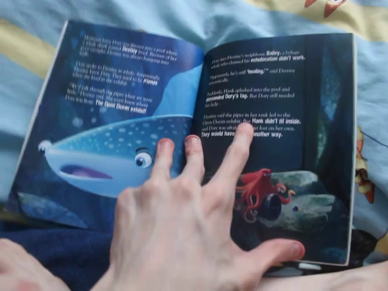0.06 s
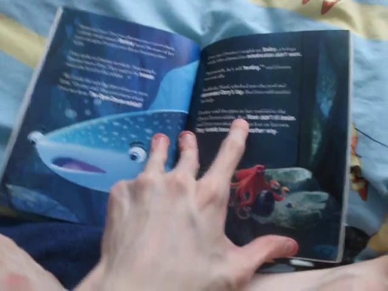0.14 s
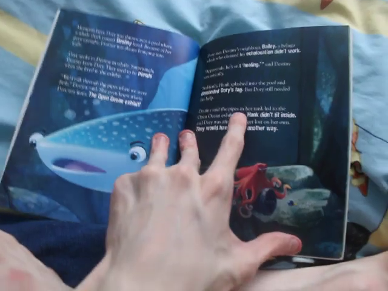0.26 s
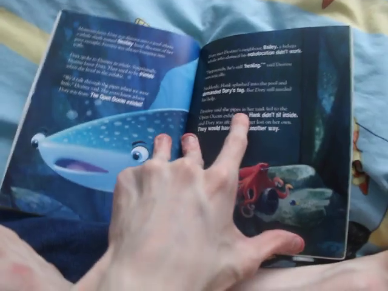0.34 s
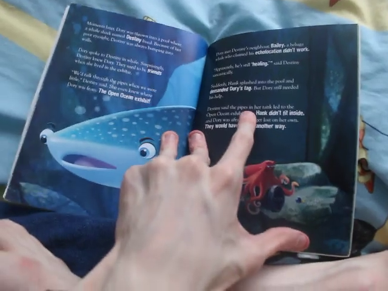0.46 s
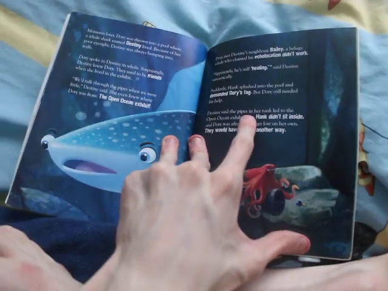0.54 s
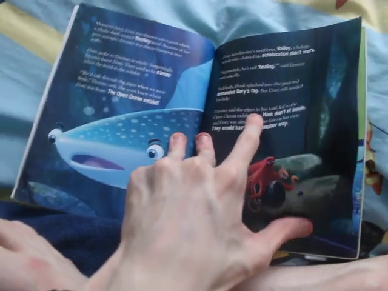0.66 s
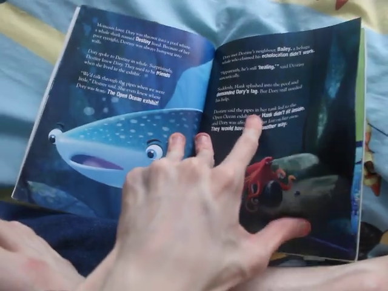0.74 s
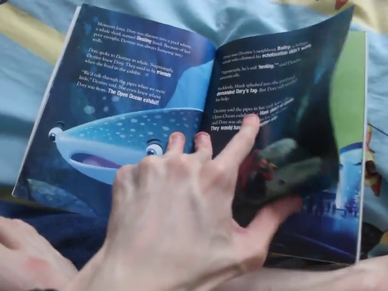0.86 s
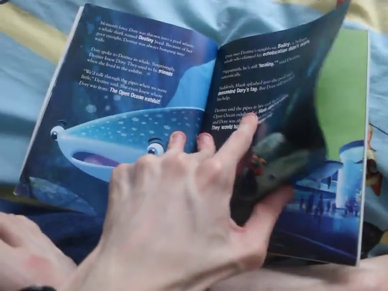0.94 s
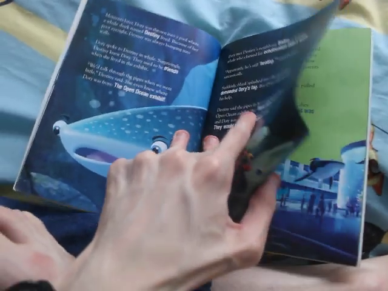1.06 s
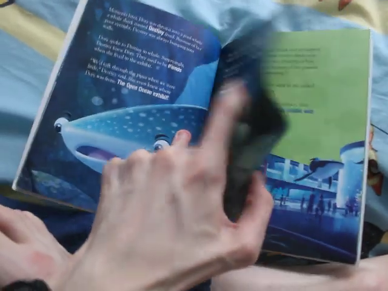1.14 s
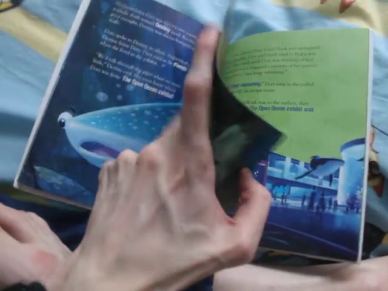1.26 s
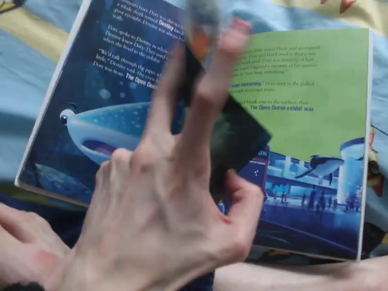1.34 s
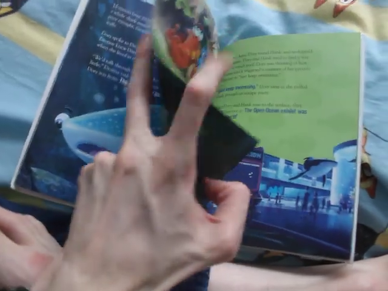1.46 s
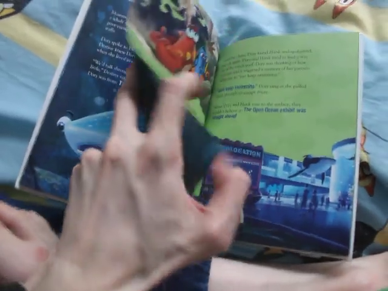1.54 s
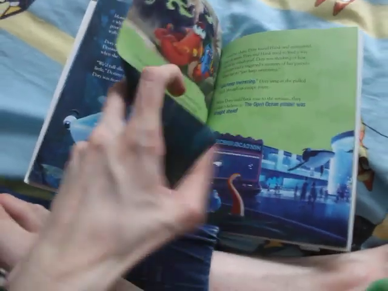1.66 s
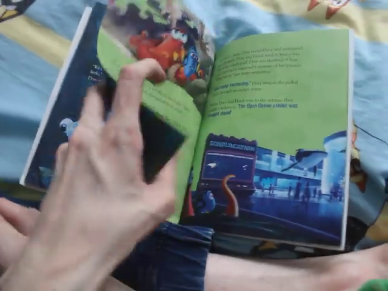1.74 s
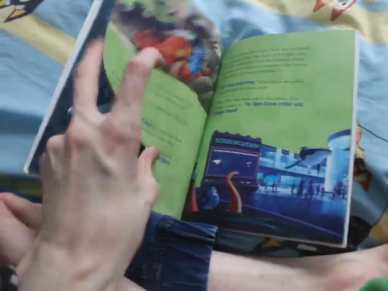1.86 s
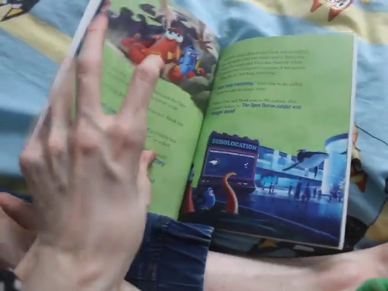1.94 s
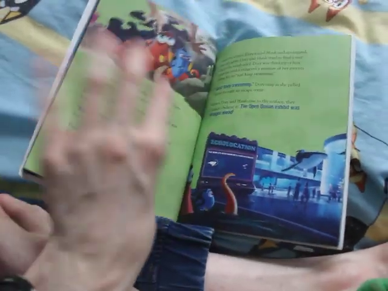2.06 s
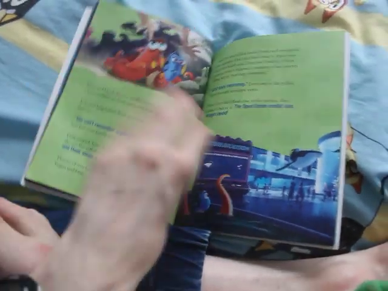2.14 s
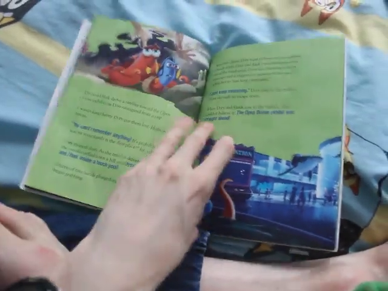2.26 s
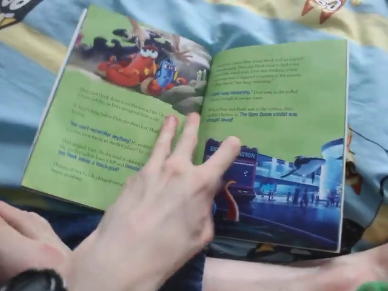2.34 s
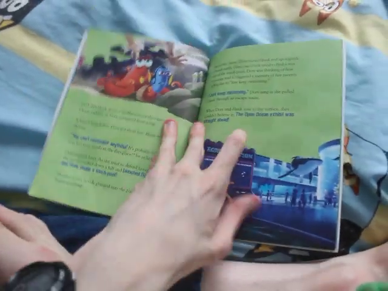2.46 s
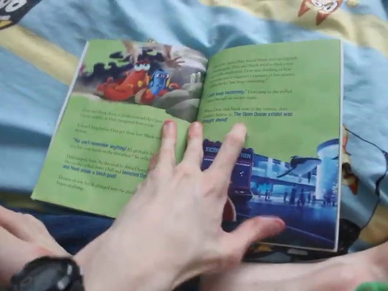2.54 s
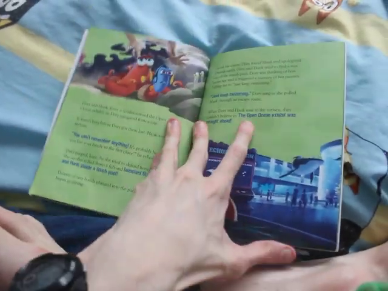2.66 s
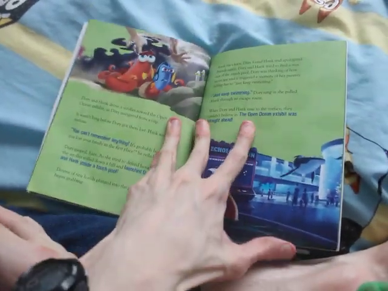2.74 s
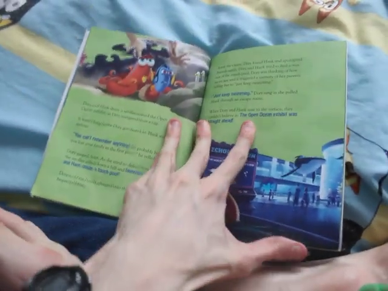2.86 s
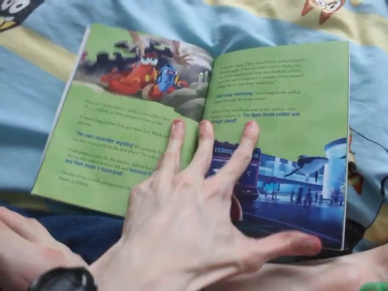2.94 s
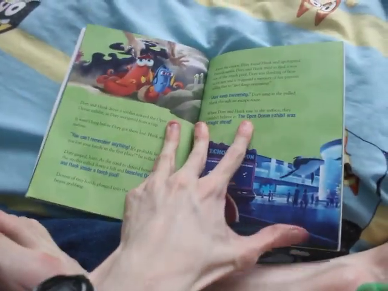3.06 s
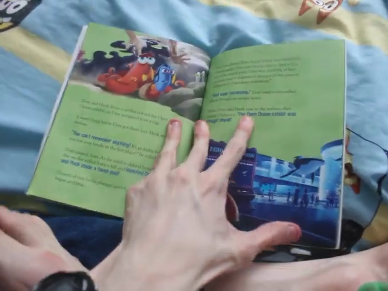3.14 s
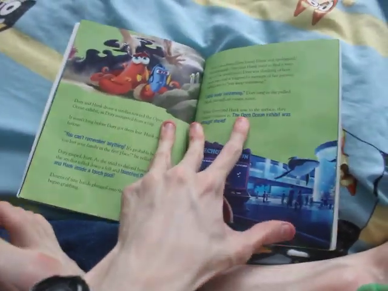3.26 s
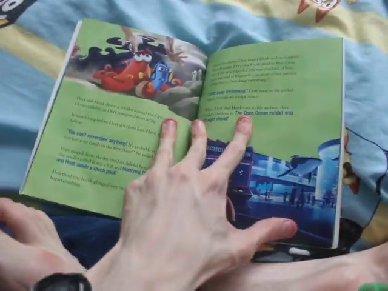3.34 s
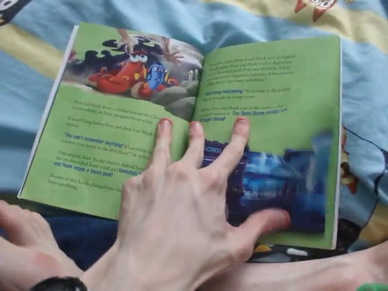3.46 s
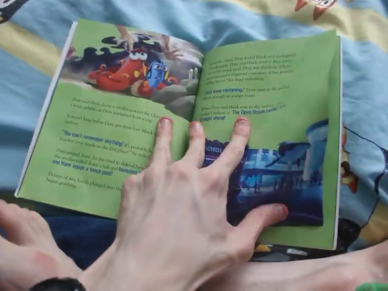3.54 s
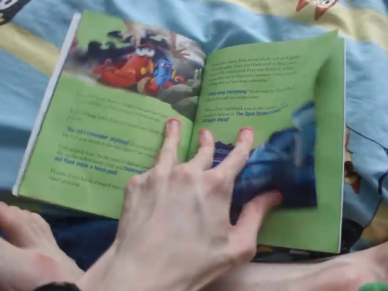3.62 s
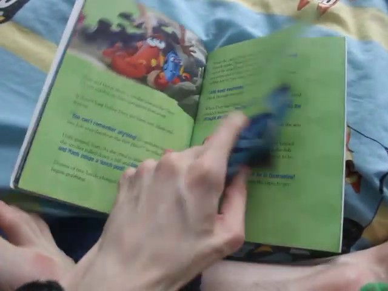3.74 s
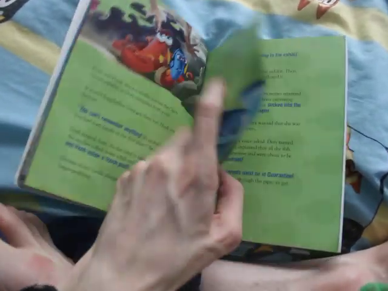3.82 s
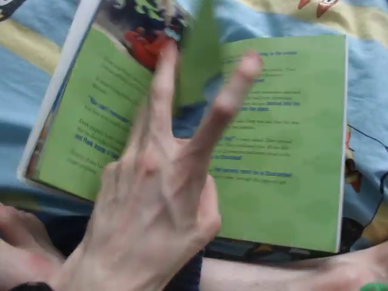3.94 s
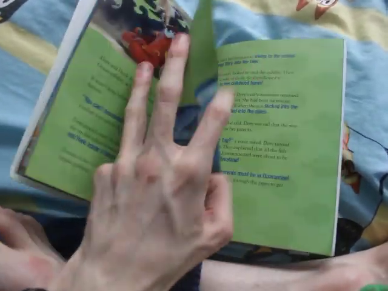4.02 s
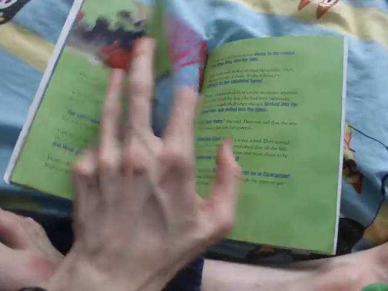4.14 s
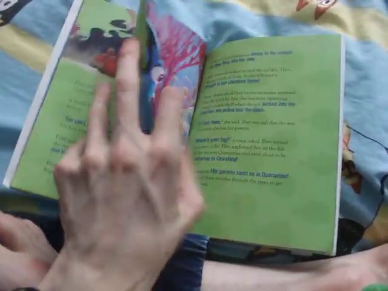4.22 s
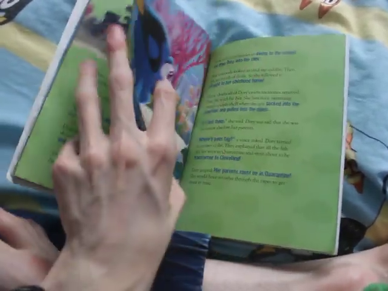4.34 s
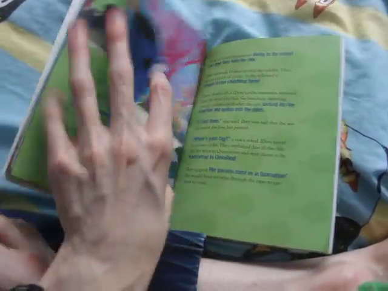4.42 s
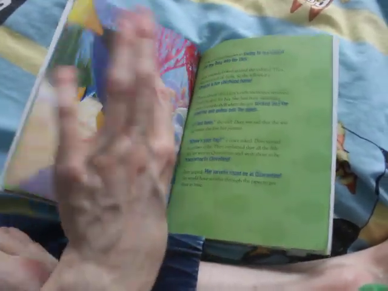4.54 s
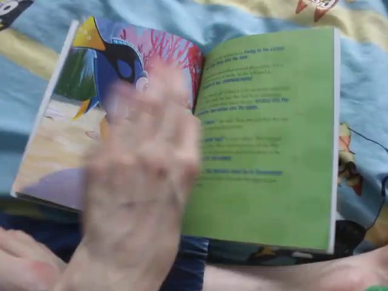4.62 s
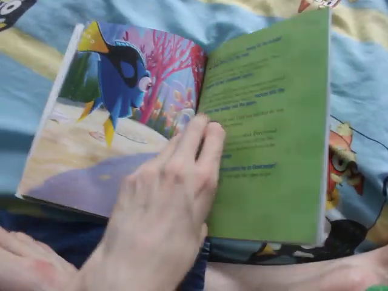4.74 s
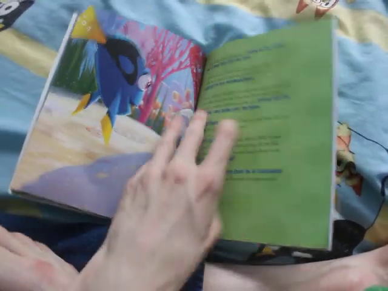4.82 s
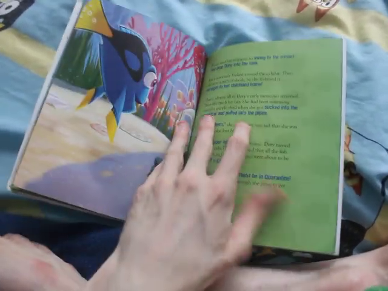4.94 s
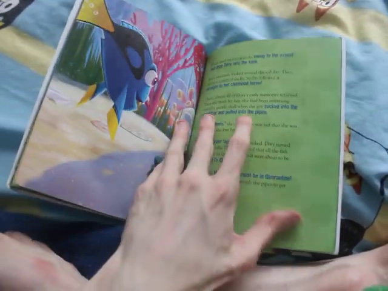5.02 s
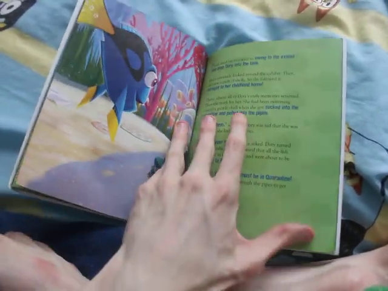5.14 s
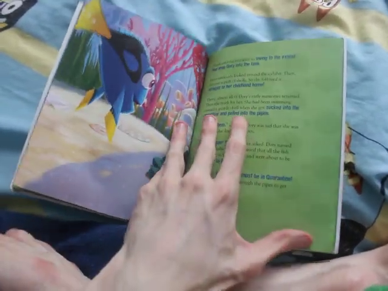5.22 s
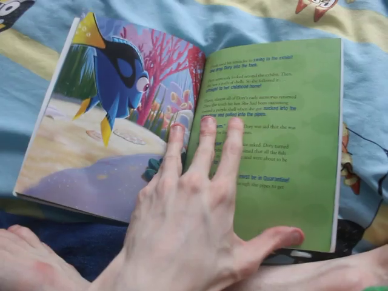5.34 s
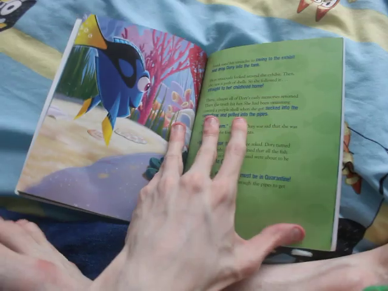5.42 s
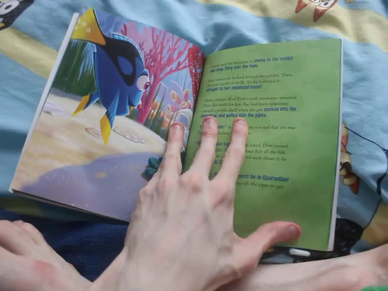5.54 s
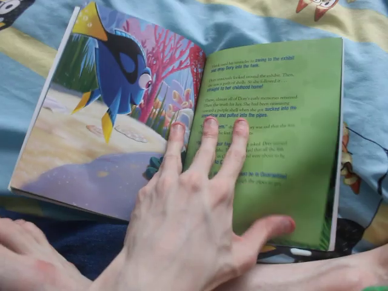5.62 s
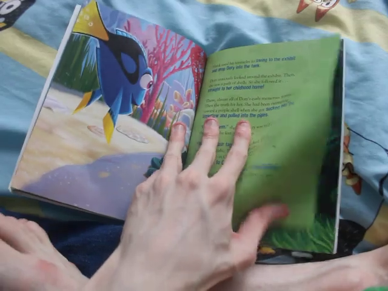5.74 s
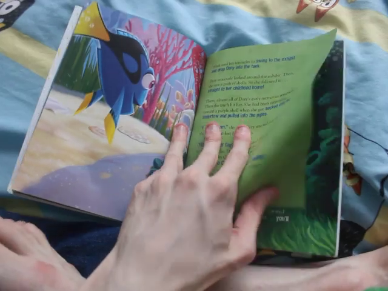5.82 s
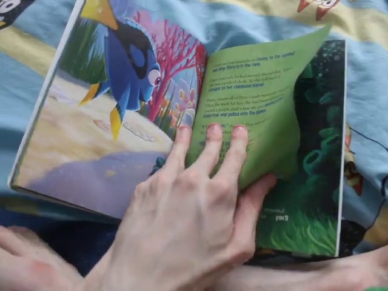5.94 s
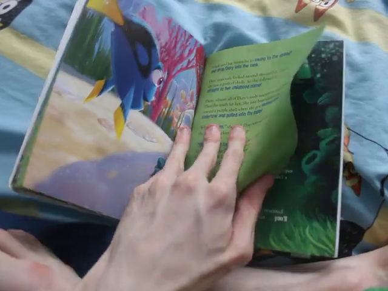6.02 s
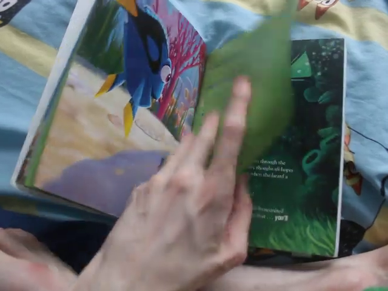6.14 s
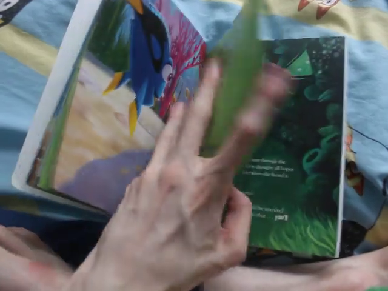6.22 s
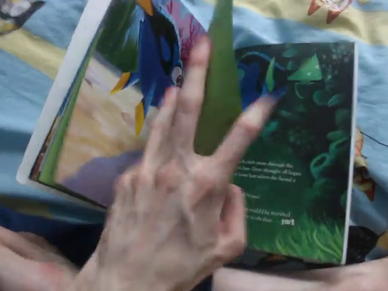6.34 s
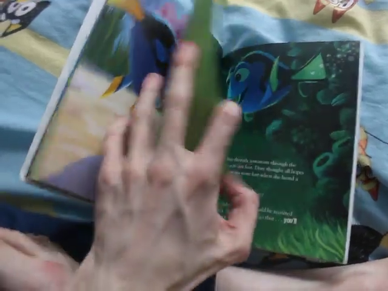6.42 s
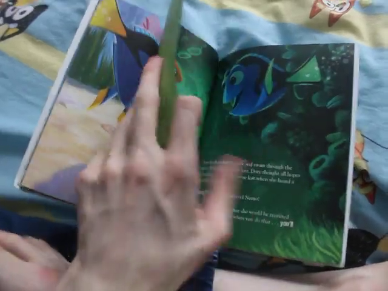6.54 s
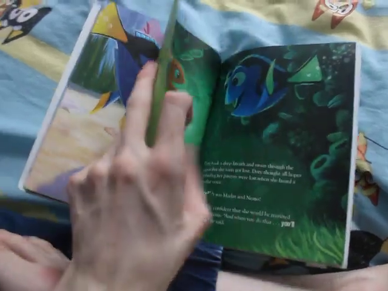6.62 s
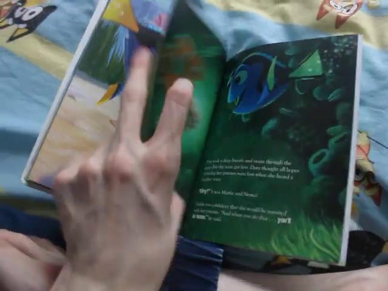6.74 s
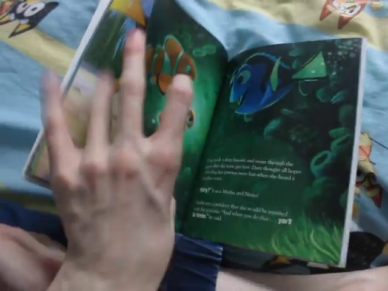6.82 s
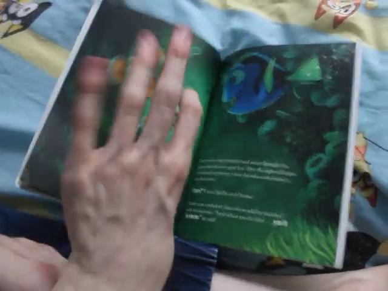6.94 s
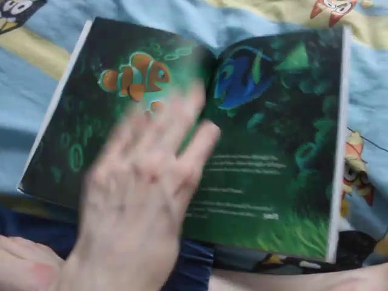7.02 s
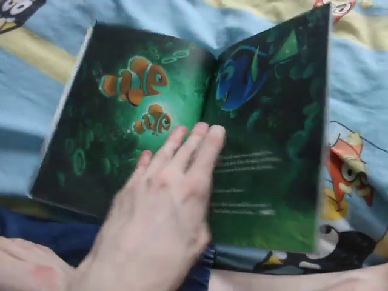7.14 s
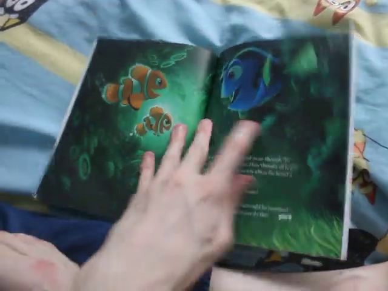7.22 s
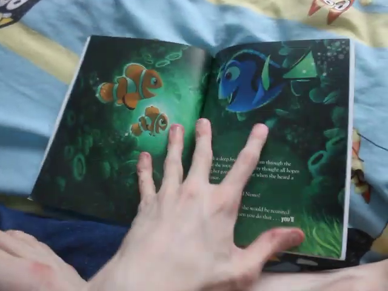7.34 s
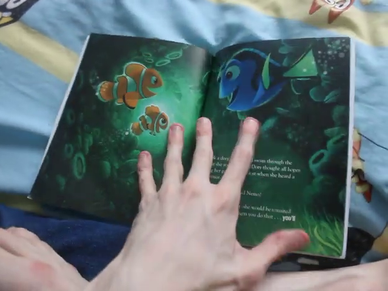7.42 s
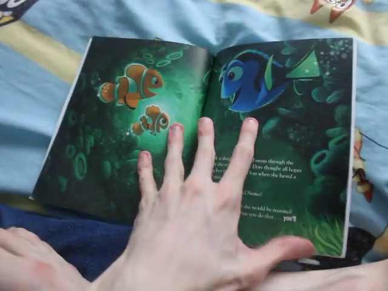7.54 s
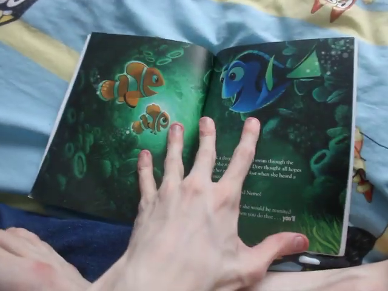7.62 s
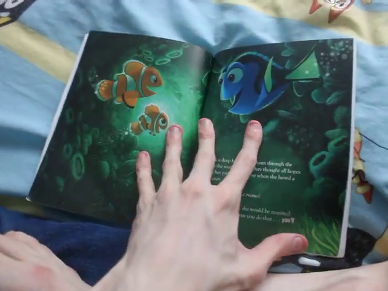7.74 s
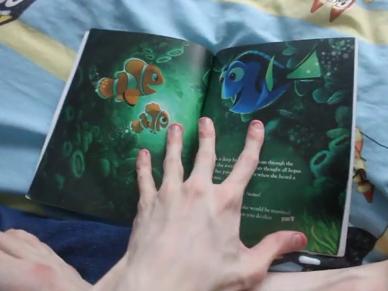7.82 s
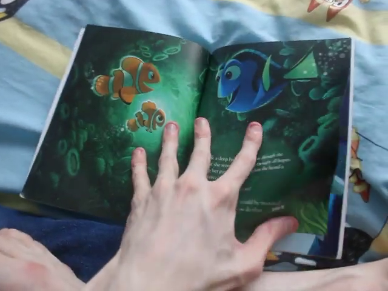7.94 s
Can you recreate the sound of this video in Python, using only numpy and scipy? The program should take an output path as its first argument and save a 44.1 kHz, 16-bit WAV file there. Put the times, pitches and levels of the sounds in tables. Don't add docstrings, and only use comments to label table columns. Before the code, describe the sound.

Close-up page turning: skin hisses on slick paper, sheets crackle and flop over three times, then small plastic rattles as the book settles on a bed.

```python
import sys
import numpy as np
from scipy import signal
from scipy.fft import rfft, irfft
from scipy.io import wavfile
from scipy.ndimage import uniform_filter1d

SR = 44100
rng = np.random.default_rng(int(sys.argv[2]) if len(sys.argv) > 2 else 0)


def linear_from_db(decibels):
    return 10 ** (np.asarray(decibels, float) / 20)


def dump_mix(stems):
    frames = np.atleast_2d(stems).T
    limited = np.clip(frames, -1, 1)
    pcm = np.round(limited * 32767).astype(np.int16)
    wavfile.write(sys.argv[1], SR, pcm)


N = 351918

# start_s, length_s, start_pressure_db, end_pressure_db, wedge_rel_db
LIFT_STROKES = [
    (0.624, 0.083, -36, -31.5, -0.5),
    (3.481, 0.066, -34.5, -32.5, 1.5),
    (5.642, 0.117, -31, -36, 4),
    (7.882, 0.12, -31.5, -33, 2),
]
FIRST_TURN_STROKES = [(0.93, 0.03, -48, -52, 4), (0.972, 0.066, -44, -48.5, 5), (1.057, 0.054, -52, -49, 3),
                      (1.115, 0.143, -45, -36.5, -0.5), (1.27, 0.054, -35.5, -42, -0.5),
                      (1.36, 0.095, -32.5, -43, 6), (1.46, 0.12, -44.5, -38.5, 5.5),
                      (1.57, 0.055, -45.5, -52.5, 11), (1.63, 0.06, -57, -59, 9),
                      (1.724, 0.16, -44.5, -33.5, 5), (1.93, 0.087, -43, -44.5, 5),
                      (2.03, 0.05, -52.5, -61, 8), (2.11, 0.015, -54, -53, 1),
                      (2.214, 0.17, -38, -54.5, -2.5)]
SECOND_TURN_STROKES = [
    (3.626, 0.067, -30.5, -36, 1),
    (3.83, 0.1, -39.5, -41, 3.5),
    (3.94, 0.12, -38.5, -36, -2),
    (4.07, 0.077, -37.5, -43, -4),
    (4.168, 0.17, -40, -54.5, 3.5),
    (4.35, 0.12, -52, -43, 4.5),
    (4.476, 0.1, -38.5, -43.5, 3),
]
THIRD_TURN_STROKES = [(5.79, 0.041, -33.5, -35.5, 2), (5.96, 0.1, -42.5, -45, 4),
                      (6.114, 0.095, -36, -34.5, 1), (6.24, 0.071, -35.5, -42.5, -4.5),
                      (6.335, 0.11, -40, -40.5, -0.5), (6.47, 0.16, -42.5, -44.5, 0.5),
                      (6.64, 0.088, -42.5, -48.5, 6), (6.79, 0.037, -34.5, -39, -3.5),
                      (6.84, 0.063, -40.5, -36, -0.5), (6.92, 0.094, -44, -55, 3)]
SETTLE_STROKES = [(0.01, 0.1, -58.5, -65, 2.5), (0.24, 0.048, -51, -53, 0), (0.365, 0.068, -45.5, -55, 1),
                  (2.4, 0.2, -52, -49, -2.5), (2.63, 0.08, -53.5, -52, -3.5), (2.74, 0.4, -62, -67, 3),
                  (2.965, 0.027, -51.5, -56, 1), (3.11, 0.04, -58.5, -58, -4),
                  (3.22, 0.059, -52.5, -60.5, 5.5), (4.59, 0.12, -46, -46, -3),
                  (4.74, 0.073, -42, -50.5, -0.5), (4.83, 0.16, -49.5, -49, -1.5),
                  (5.02, 0.26, -51.5, -62.5, -4.5), (5.34, 0.036, -55, -51.5, 1),
                  (7.045, 0.165, -47, -49, 0.5), (7.23, 0.13, -47, -56, 0), (7.38, 0.22, -58, -62, 4),
                  (7.63, 0.05, -53.5, -58, 6), (7.69, .17, -66, -67, 11), (7.795, 0.02, -52.5, -58, 6)]
# start_s, length_s, start_pressure_db, end_pressure_db, wedge_rel_db
SKIM_STROKES = [
    (0.792, 0.12, -39, -30.5, -3),
    (3.7, 0.12, -34, -37.5, -3),
    (5.85, 0.092, -36, -38.5, -4),
]
# freq_hz, density_db
SKIN_SPECTRUM = [(2060, -1), (3500, -12), (4010, 9), (4390, 7), (6570, 12.5), (7490, 9.5), (8140, 7),
                 (9280, -2), (10800, -9), (14500, -38)]
# start_s, length_s, level_db, pitch_hz, width_hz
SKIN_SQUEAK = (3.355, 0.11, -55, 2950, 230)

# time_s, peak_db, thump_rel_db, crack_rel_db, ring_hz
SNAP_EVENTS = [(0.1955, -16, -36, -13, 2500), (1.15, -30.5, -5, -20, 700), (1.497, -20, -41, -3.5, 2380),
               (1.999, -21.5, -28, -7, 2100), (2.787, -38.5, 1, -30, 740), (3.382, -46, -8, -4, 2820),
               (4.529, -19, -28, -8, 2100), (6.469, -24, -7, -7, 950), (1.872, -11, -31, -8, 1890),
               (1.353, -23, -30, -4, 3100), (1.373, -15, -30, -14, 2450), (3.707, -24, -30, -8, 4500),
               (6.887, -19.5, -25, -12, 1790), (6.895, -24, -23, -10, 1900), (7.166, -22, -15, -39, 990),
               (2.283, -17, -14.5, -35, 697)]
SHIVER_EVENTS = [
    (1.838, -24, -30, 2, 2720),
    (1.866, -19, -42, 2.5, 1730),
    (7.052, -34, -11, -7, 910),
]
CREASE_EVENTS = [(1.868, -15.5, -21, -4.5, 1490), (1.986, -23.5, -39, -9.5, 1940),
                 (2.223, -39.5, -6, -19, 617), (2.28, -26.5, -10, -24, 800), (3.632, -17.5, -25, -12, 1150),
                 (4.071, -32, -4, -7, 970), (4.2, -17.5, -29, -13, 1320), (4.219, -32, -26, -27, 950),
                 (4.243, -26, -29, -10, 1230), (4.562, -19.5, -30.5, -11, 2300),
                 (4.794, -22, -9.5, -32, 894), (6.216, -19, -27, -29, 900), (6.421, -30, -10.5, -6, 990),
                 (6.804, -29, -36, -3.5, 1910)]
FLAP_EVENTS = [(1.26, -22, -24, -10, 4060), (1.364, -18.5, -25, -8, 2400), (2.004, -25, -25, -14.5, 2130),
               (4.746, -35, -4, -24, 885), (6.021, -31, -36, -8, 1220), (6.159, -21.5, -33, -12, 3250),
               (6.373, -24.5, -17.5, -9, 1380), (6.884, -24, -22, -15, 1840),
               (7.164, -27.5, -15.5, -39, 930), (7.208, -34.5, -30, -20, 1840)]
TICK_EVENTS = [(0.087, -36.5, -15, 6.5, 1090), (0.2173, -48, -25, 10, 2800), (0.382, -27.5, -14, 3, 1150),
               (0.414, -38, -15, 2, 2700), (0.964, -12.5, -30, -8.5, 4250), (1.009, -16.5, -30, -12, 4400),
               (1.074, -17, -28, -12, 3730), (1.111, -15, -25, -9, 4340), (1.159, -29, -15, -5, 4300),
               (1.342, -28, -30.5, 0, 3900), (1.441, -31, -35.5, 0, 3000), (1.561, -9, -33, -12, 4050),
               (1.719, -33, -35, 0, 3000), (1.724, -38, -35, 0, 3000), (1.863, -20, -34, 0, 2300),
               (3.592, -36, -11, -4, 3000), (4.167, -30, -26, -10, 1200), (6.113, -22, -35, -6, 3800),
               (6.136, -24, -35, -6, 3500), (6.407, -29, -25, -4, 2500), (7.123, -39, -25, 5, 3000),
               (0.139, -42, -25, -15, 2050), (1.399, -25, -30, -10, 3200), (1.455, -27, -30, -10, 2800)]
NICK_EVENTS = [(0.264, -28, -22, -10, 1900), (0.455, -40, -18, -4, 2400), (1.418, -23, -35, -6, 3100),
               (1.523, -24.5, -39, -6, 2800), (1.731, -28, -32, -1, 3500), (4.485, -18.5, -41, -11, 3800),
               (6.502, -24, -28, -12, 2060), (6.555, -23.5, -21, -11, 1900), (6, -30, -18, -10, 1060),
               (1.568, -19, -30, -16, 1480), (0.802, -33, -30, 0, 3500), (3.619, -27, -35, 0, 3500),
               (4.536, -14.5, -30, -18, 1730), (3.943, -20, -22, -30.5, 1150),
               (4.259, -20.5, -24, -7.5, 1300), (6.222, -22, -32, -30, 950), (1.268, -26, -30, -9, 4000),
               (1.276, -25, -30, -9, 3000), (1.855, -21, -35, -4, 4000), (1.879, -18, -30.5, -12, 1560),
               (6.054, -27, -27, -5, 1280), (6.38, -25, -25, -13, 2100), (6.641, -25, -12, -25, 900),
               (6.915, -28, -23, -9, 1700), (3.936, -21.5, -19, -30, 1020), (7.079, -33, -13, -20, 1000),
               (4.803, -29, -10, -30, 900)]
KNOCK_EVENTS = [
    (3.835, -10, -23, -36, 1320),
    (4.339, -19, -28, -32, 1320),
    (5.457, -25, -8, -38, 774),
    (6.633, -18, -15, -28, 1280),
    (3.93, -15, -20.5, -33, 1180),
]

# time_s, peak_db, pitch_hz, t60_s
PATCH_RINGS = [(0.1957, -20, 1980, .022), (0.1957, -14, 2890, .016), (0.1957, -28, 6110, .014),
               (0.1957, -22, 4300, .007), (4.3395, -19, 1370, .022), (4.3395, -17, 1080, .024),
               (4.3395, -20, 2900, .017), (4.3395, -24, 3800, .009), (6.6328, -15, 974, .017),
               (6.6328, -20, 1390, .012), (6.6328, -22, 2300, .011), (6.6328, -22, 3700, .009),
               (6.6328, -25, 520, .06), (6.617, -31, 4000, .012), (6.617, -31, 1100, .018),
               (5.4575, -25, 781, .055), (5.4575, -23, 560, .04), (5.4577, -12, 900, .009),
               (1.863, -6, 6900, .011), (1.8632, -12, 2300, .011), (1.8632, -13, 4300, .009),
               (1.8632, -21, 9600, .008), (1.8705, -16, 6900, .014), (1.8618, -18, 6900, .012)]
# start_s, length_s, level_db, pitch_hz, width_hz
AIR_POCKETS = [(3.7, .035, -37, 4600, 500), (6.642, .045, -37, 2600, 450), (3.945, .025, -36, 2400, 500),
               (1.425, .09, -41, 2600, 600), (1.395, .03, -39, 6800, 900), (1.53, .03, -38, 6700, 900),
               (6.368, .025, -37, 3500, 500), (1.88, .045, -36, 5700, 700), (5.465, .06, -43, 750, 500),
               (3.855, .04, -40, 2300, 500), (3.505, .05, -39, 6900, 900), (6.115, .03, -38, 2600, 600),
               (5.99, .035, -42, 2400, 700), (0.259, .014, -34, 1750, 350), (4.8, .04, -41, 800, 500),
               (1.868, .015, -28, 6900, 700), (0.262, .007, -34, 3440, 450), (0.262, .007, -32, 6250, 600),
               (3.475, .035, -39, 3400, 900), (4.068, .018, -43, 520, 300), (3.624, .022, -31, 2900, 900),
               (4.528, .016, -29, 2900, 1800), (5.632, .035, -36, 3900, 1000)]
# time_s, peak_db, push_s
JOLT_EVENTS = [(0.087, -24.5, .0012), (0.382, -21.5, 0.0013), (0.414, -36, .001), (0.964, -29, .001),
               (1.009, -32, 0.0011), (1.074, -28.5, 0.0013), (1.111, -28.5, .0012), (1.149, -27, 0.0016),
               (1.159, -30, .001), (2.226, -32, .0015), (2.379, -33, .0015), (2.787, -29, 0.0013),
               (3.592, -31.5, .001), (4.072, -33, .001), (6.47, -29, .001)]
# time_s, peak_db, low_pair_share (0-1)
RATTLE_EVENTS = [(2.8055, -37, 0.4), (3.151, -36, 0.4), (3.2637, -38.5, 0.43), (7.3065, -33, 0.6),
                 (7.3746, -42, 0.5), (7.4202, -34, 0.55), (7.447, -30, 0.72), (7.4934, -34, 0.84),
                 (7.515, -30.5, 0.7), (7.5364, -44, 0.3), (7.561, -33.5, 0.8), (7.5826, -33, 0.74),
                 (7.6053, -39, 0.7), (7.6288, -28.5, 0.64), (7.652, -33, 0.6), (7.0335, -34, 0.15),
                 (7.0538, -37, 0.15), (7.0782, -36, 0.15), (7.1276, -45, 0.15), (7.1475, -37, 0.15)]
# freq_hz, level_db, t60_s
PLASTIC_MODES = [(1667, -3, 0.04), (1990, -1.5, 0.04), (2720, 2, 0.04), (3000, 7.5, 0.042)]
# time_s, peak_db, rise_s_per_20db, fall_s_per_20db
SHIFT_SWELLS = [(0.0, -46, 0.1, 0.2), (0.095, -42, 0.035, 0.1), (0.39, -45, 0.2, 0.05),
                (1.16, -39, 0.13, 0.045), (1.39, -52, 0.5, 0.5), (1.88, -44, 0.44, 0.1),
                (2.28, -36.5, 0.08, 0.14), (2.6, -49.5, 1, 0.3), (3.49, -51, 0.3, 0.5),
                (3.94, -51, 0.8, 0.5), (4.39, -39, 0.11, 0.28), (4.76, -43.5, 0.2, 0.09),
                (5.2, -54, 1, 0.2), (5.46, -39.5, 0.09, 0.08), (5.74, -43, 0.2, 0.3), (6.19, -49, 0.5, 0.6),
                (7.08, -46.5, 0.6, 1.1), (7.89, -50, 0.27, -0.5)]
# time_s, peak_db, rise_s_per_20db, fall_s_per_20db
FLUTTER_SWELLS = [(0.67, -53, 0.45, 0.5), (1.17, -52, 0.3, 0.6), (1.39, -45.5, 0.6, 0.3),
                  (1.88, -51, 0, 0.3), (2.28, -45.5, 0.05, 0.16), (2.6, -54.5, 0.4, 1.4),
                  (3.94, -46, 0.4, 0.6), (4.46, -47.5, 0.2, 0.5), (4.76, -40, 0.05, 0.18),
                  (5.46, -57, 0.5, 0.5), (5.74, -45, 0.4, 0.12), (6.19, -44, 0.23, 0.25),
                  (6.38, -50, 0.6, 0.4), (6.67, -47, 0.5, 0.15), (7.1, -47, 0.17, 0.66),
                  (7.89, -52.5, 0.3, -1)]
# freq_hz, density_db
ROOM_SPECTRUM = [(12, -18), (20, 8), (112, 2), (140, -2.5), (180, 5), (306, 2), (362, -17), (1070, -12),
                 (1160, -35), (3750, -26), (5690, -21), (6190, -18), (8170, -20), (15500, -31.5)]
# freq_hz, width_hz, level_db
HUM_BANDS = [(98.4, 12, -63.5), (478.4, 28, -64)]

GRIP_DB_PER_S, LET_GO_DB_PER_S, LIFT_GRIP_DB_PER_S = 455, 524, 1100
REST_DB, REST_WEDGE_DB = -67.5, 10
WEDGE_HZ, WEDGE_LOW_HZ, FIRM_DB, DB_PER_OCTAVE = 1620, 900, -38, 21.5
NARROW_HZ, OPEN_HZ, OPEN_S, THIN_HZ = 4600, 1280, 0.035, 2800
RING, LIFT_RING = 0.41, 1.0
LIGHT_DB, LIGHT_HZ, LIGHT_LOSS_DB = -42, 5200, 7
MIC_HZ, MIC_WIDTH_HZ = 6850, 1300


def slide():
    grains = evened(slips(per_s=9000, spread_db=1.1, clump_db=1.1))
    hz, t, z = signal.stft(grains, SR, nperseg=256, noverlap=192)
    pressure_db, wedge_db, wedge_hz, ring = hand(t)
    hz = hz[:, None]
    ratio = (hz + 1) / wedge_hz

    shut = np.clip((ring - RING) / (LIFT_RING - RING), 0, 1) ** 4 * np.clip(wedge_hz / 2000 - .8, 0, 1)
    wedge = 1 + ring * np.exp(-(np.log(ratio / 1.2) / .22) ** 2)
    wedge = wedge / np.sqrt(1 + (ratio / (0.63 + .25 * shut)) ** -6.)
    wedge = wedge / np.sqrt(1 + (hz / 4800) ** 7.6)

    light_loss_db = np.clip(LIGHT_DB - pressure_db, 0, LIGHT_LOSS_DB) / (1 + (hz / LIGHT_HZ) ** 12)
    hiss = linear_from_db(read(SKIN_SPECTRUM, hz)) * linear_from_db(-light_loss_db)
    hiss = hiss * np.sqrt(.08 + .92 / (1 + shut * (ratio / .85) ** -6.))

    def unit(gain, lo_hz, hi_hz):
        return gain / np.sqrt((gain[lo_hz // 172:hi_hz // 172] ** 2).sum(0) / 128)

    hiss_gain = linear_from_db(-1.0) * unit(hiss, 4500, 9000)
    wedge_gain = linear_from_db(np.minimum(wedge_db, 14) - 1.43) * unit(wedge, 1060, 6300)
    patches = uniform_filter1d(rng.standard_normal(z.shape), 4, 0)
    patches = evened(uniform_filter1d(patches, 12, 1))
    z = z * np.hypot(hiss_gain, wedge_gain) * linear_from_db(pressure_db + 2.16 * patches)
    return signal.istft(z, SR, nperseg=256, noverlap=192)[1][:N]


def hand(t):
    skin, air = linear_from_db(2 * REST_DB), linear_from_db(2 * (REST_DB + REST_WEDGE_DB))
    for *row, wedge_db in FIRST_TURN_STROKES + SECOND_TURN_STROKES + THIRD_TURN_STROKES + SETTLE_STROKES:
        power = stroke(t, GRIP_DB_PER_S, *row)
        skin = skin + power
        air = air + power * linear_from_db(2 * wedge_db)
    octaves = (10 * np.log10(skin) - FIRM_DB) / DB_PER_OCTAVE
    pitch = air * np.maximum(WEDGE_HZ * 2 ** octaves, WEDGE_LOW_HZ)
    ring = RING * air

    gaps = [(LIFT_STROKES, LIFT_GRIP_DB_PER_S, NARROW_HZ, OPEN_HZ, LIFT_RING),
            (SKIM_STROKES, GRIP_DB_PER_S, THIN_HZ, THIN_HZ, RING)]
    for table, grip, from_hz, to_hz, height in gaps:
        for *row, wedge_db in table:
            power = stroke(t, grip, *row)
            gap = power * linear_from_db(2 * wedge_db)
            hz = to_hz + (from_hz - to_hz) * np.exp(-np.maximum(t - row[0] + 0.012, 0) / OPEN_S)
            skin, air = skin + power, air + gap
            pitch, ring = pitch + gap * hz, ring + gap * height
    return 10 * np.log10(skin), 10 * np.log10(air / skin), pitch / air, ring / air


def stroke(t, grip_db_per_s, start_s, length_s, in_db, out_db):
    end_s = start_s + length_s
    held_db = np.interp(t, [start_s, end_s], [in_db, out_db])
    grip_db = grip_db_per_s * np.maximum(start_s - t, 0)
    let_go_db = LET_GO_DB_PER_S * np.maximum(t - end_s, 0)
    return linear_from_db(2 * (held_db - grip_db - let_go_db))


def slips(per_s, spread_db, clump_db):
    sizes = linear_from_db(spread_db * np.minimum(rng.exponential(1, N), 4) + clump_db * wobble(size=250))
    hits = rng.random(N) < per_s / SR
    return evened(rng.standard_normal(N) * (0.44 + sizes * hits))


def squeak():
    start_s, length_s, level_db, hz, width_hz = SKIN_SQUEAK
    out, z = np.zeros(N), rng.standard_normal(6000)[:round(length_s * SR)]
    whistle = evened(resonate(resonate(z, hz, width_hz), hz, width_hz))
    add(out, start_s, linear_from_db(level_db) * np.sqrt(np.hanning(len(z))) * whistle)
    return out


def sheet():
    sharp = dict(rise_s=.0003, blow=11, tail_db=-19, stiff_hz=328, tail_s=0.13)
    soft = dict(rise_s=0.0048, blow=3.7, tail_db=-13.5, stiff_hz=507, tail_s=0.15)
    out = buckles(SNAP_EVENTS, t60_s=0.025, **sharp)
    out += buckles(SHIVER_EVENTS, t60_s=0.065, **sharp)
    out += buckles(CREASE_EVENTS, t60_s=0.032, **soft)
    out += buckles(FLAP_EVENTS, t60_s=0.077, **soft)
    out += buckles(TICK_EVENTS, t60_s=0.013, rise_s=.0003, blow=12.7, tail_db=-24, stiff_hz=333, tail_s=.1)
    out += buckles(NICK_EVENTS, t60_s=0.018, rise_s=.0022, blow=3.0, tail_db=-22, stiff_hz=450, tail_s=.11)
    out += buckles(KNOCK_EVENTS, t60_s=0.028, rise_s=0.000398, blow=7, tail_db=-17, stiff_hz=390, tail_s=0.19)
    return out


def buckles(table, t60_s, rise_s, blow, tail_db, stiff_hz, tail_s):
    out, t = np.zeros(N), np.arange(5000) / SR - 3 * rise_s
    swell = np.exp(-(np.minimum(t, 0) / rise_s) ** 2)
    late = np.maximum(t, 0)
    strike = blow * (np.arange(len(t)) == round(3 * rise_s * SR))

    def fade(share):
        return swell * (linear_from_db(-60 * late / (share * t60_s)) + linear_from_db(tail_db - 60 * late / tail_s))

    noise = rng.standard_normal((len(table), 3, len(t)))
    for (s, peak_db, thump_db, crack_db, hz), z in zip(table, noise):
        z = z + strike
        top_hz = np.clip(hz * hz / stiff_hz, 1.5 * hz, max(5600, 1.53 * hz))
        broad = band(z[0] * fade(1), 0.5 * hz, top_hz, order=5)
        body = peaked(peaked(resonate(broad, hz, 0.34 * hz)) + 0.79 * peaked(broad))
        crack = band(z[1] * fade(0.89), 4000, 8000, order=4)
        crack = peaked(crack + 0.63 * resonate(crack, MIC_HZ, MIC_WIDTH_HZ))
        thump = peaked(band(z[2] * fade(1.6), 146, 620, order=3))
        sound = body + linear_from_db(crack_db + 7.5) * crack + linear_from_db(thump_db + 5) * thump
        add(out, s + .0005 - 3 * rise_s, linear_from_db(peak_db + 1.5) * sound)
    return out


def rings():
    out, t = np.zeros(N), np.arange(2500) / SR
    rise = 1 - np.exp(-(t / .0005) ** 2)
    for (s, peak_db, hz, t60_s), z in zip(PATCH_RINGS, rng.standard_normal((len(PATCH_RINGS), len(t)))):
        grain = 1 + .5 * evened(uniform_filter1d(z, size=24))
        shape = rise * linear_from_db(-60 * t / t60_s)
        tone = grain * shape / shape.max() * np.sin(2 * np.pi * hz * t)
        add(out, s - .5 / hz, linear_from_db(peak_db) * band(tone, .55 * hz, 1.5 * hz, order=3))
    return out


def pockets():
    out = np.zeros(N)
    noise = rng.standard_normal((len(AIR_POCKETS), 6000))
    for (s, length_s, level_db, hz, width_hz), z in zip(AIR_POCKETS, noise):
        u = np.linspace(0, 1, round(length_s * SR))
        tone = evened(resonate(resonate(z, hz, width_hz), hz, width_hz))[-len(u):]
        add(out, s, linear_from_db(level_db) * np.sin(np.pi * u ** 0.6) * tone)
    return out


def jolts():
    out, t = np.zeros(N), np.arange(1500) / SR
    for s, peak_db, push_s in JOLT_EVENTS:
        u = t / push_s
        puff = -(1 - u) * np.exp(-u) * np.minimum(t / 0.00042, 1)
        add(out, s, linear_from_db(peak_db) * peaked(band(puff, 42, 1400)))
    return out


def rattles():
    out, t = np.zeros(N), np.arange(2500) / SR
    knocks = rng.standard_normal((len(RATTLE_EVENTS), 10))
    for (s, peak_db, low), knock in zip(RATTLE_EVENTS, knocks):
        modes = [linear_from_db(db - 60 * t / t60_s) * np.sin(2 * np.pi * hz * (1 + 0.022 * detune) * t)
                 for (hz, db, t60_s), detune in zip(PLASTIC_MODES, knock)]
        mixed = np.array([low, low, 1 - low, 1 - low]) @ modes
        ring = signal.oaconvolve(mixed, abs(knock) * np.hanning(len(knock)))
        add(out, s - .001, linear_from_db(peak_db) * peaked(ring))
    return out


def bed():
    z = rng.standard_normal(N)
    mattress = evened(resonate(resonate(z, 123, 84), 132, 104))
    rumble = evened(mattress + 0.62 * evened(band(z, 72, 357, order=3)))
    flutter = evened(band(slips(per_s=1500, spread_db=2.5, clump_db=4.0), 309, 1130, order=3))
    rumble = linear_from_db(-2.1) * swells(SHIFT_SWELLS, rest_db=-61) * rumble
    return rumble + linear_from_db(0.5) * swells(FLUTTER_SWELLS, rest_db=-62) * flutter


def swells(table, rest_db):
    t = np.arange(0, N / SR + .01, .002)
    power = linear_from_db(2 * rest_db)
    for s, db, rise, fall in table:
        power = power + linear_from_db(2 * np.minimum(db + 20 * (t - s) / rise, db - 20 * (t - s) / fall))
    return np.interp(np.arange(N) / SR, t, np.sqrt(power))


def room():
    air = colour(rng.standard_normal(N), ROOM_SPECTRUM) * linear_from_db(-57 + 2.6 * wobble(size=4000))
    fuzz = np.zeros(N)
    for hz, width_hz, db in HUM_BANDS:
        hum = resonate(resonate(rng.standard_normal(N), hz, width_hz), hz, width_hz)
        fuzz += linear_from_db(db) * evened(hum)
    line = np.sin(2 * np.pi * np.cumsum(300 + 2.39 * wobble(size=3000)) / SR)
    return air + fuzz + linear_from_db(-56.0 + 1.2 * wobble(size=2500)) * line


def evened(x):
    return x / np.sqrt(np.mean(x ** 2) + 1e-20)


def peaked(x):
    return x / abs(x).max()


def read(points, hz):
    f, value = np.transpose(points)
    return np.interp(np.log(hz + 1), np.log(f + 1), value)


def add(mix, s, sound):
    part = mix[round(s * SR):][:len(sound)]
    part += sound[:len(part)]


def band(x, lo_hz, hi_hz, order=2):
    return signal.sosfilt(signal.butter(order, [lo_hz, hi_hz], "bandpass", fs=SR, output="sos"), x)


def colour(x, points):
    gain = linear_from_db(read(points, np.fft.rfftfreq(len(x), 1 / SR)))
    return evened(irfft(rfft(x) * gain, len(x)))


def resonate(x, hz, width_hz):
    turn = np.exp(2j * np.pi * np.cumsum(hz * np.ones(len(x))) / SR)
    r = np.exp(-np.pi * width_hz / SR)
    return 2 * (turn * signal.lfilter([1 - r], [1, -r], x / turn + 1e-18)).real


def wobble(size):
    return evened(uniform_filter1d(uniform_filter1d(rng.standard_normal(N), size), size))


def scene():
    paper = slide() + squeak() + sheet() + rings() + pockets()
    return (paper + jolts() + rattles() + bed() + room())[None]


def band_limit(x):
    return signal.sosfilt(signal.butter(12, 16490, fs=SR, output="sos"), x)


def record(dry):
    limited = np.clip(dry, -.9, .9)
    mic = signal.sosfilt(signal.butter(10, 14800, fs=SR, output="sos"), limited)
    return band_limit(mic)


dry = scene()
out = record(dry)
dump_mix(out)
```